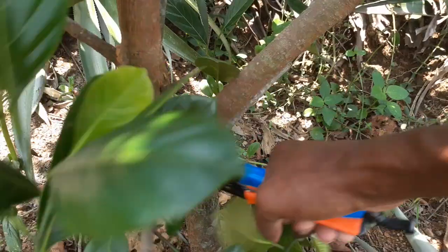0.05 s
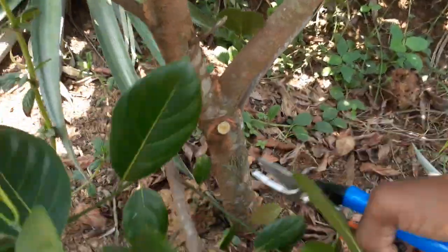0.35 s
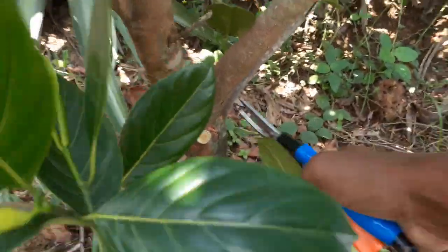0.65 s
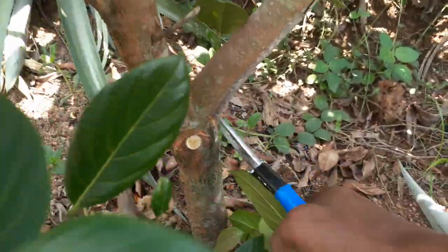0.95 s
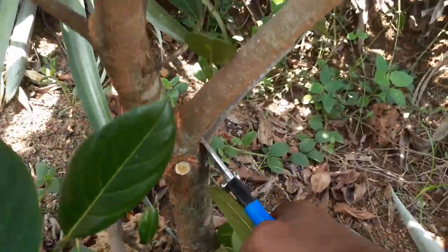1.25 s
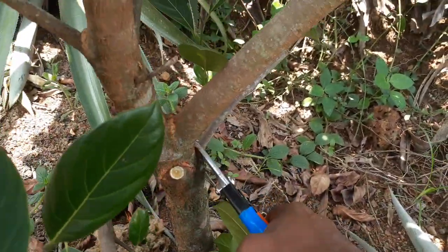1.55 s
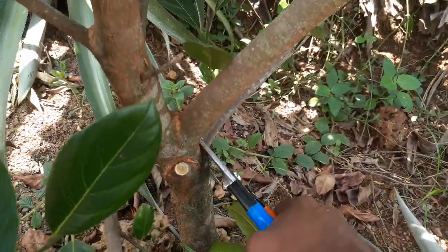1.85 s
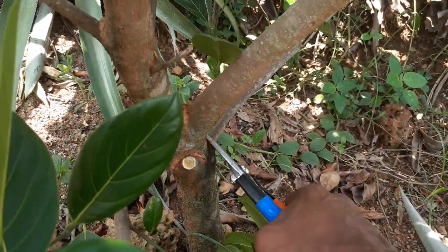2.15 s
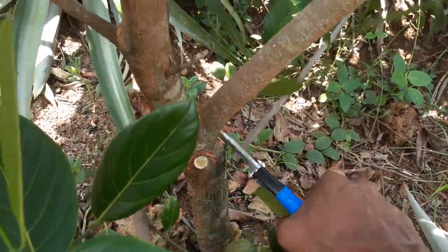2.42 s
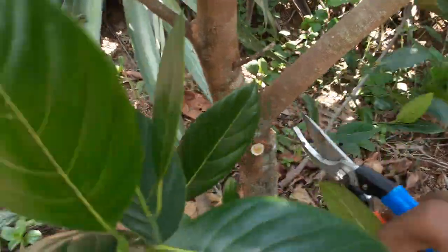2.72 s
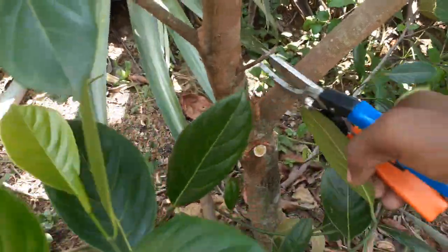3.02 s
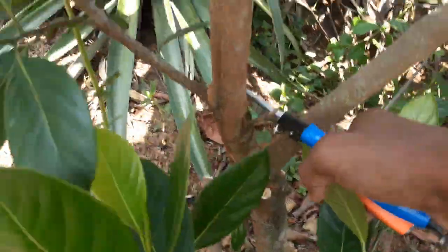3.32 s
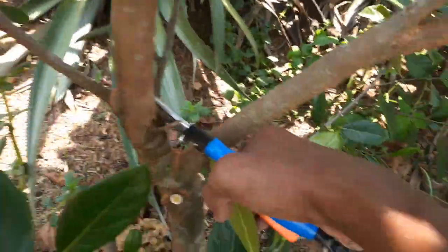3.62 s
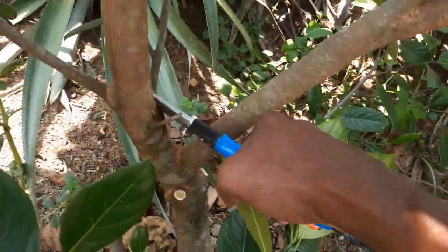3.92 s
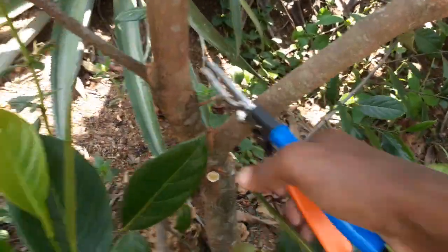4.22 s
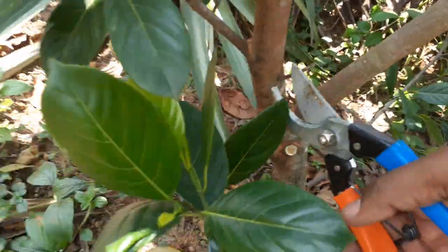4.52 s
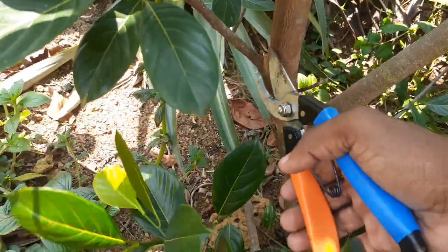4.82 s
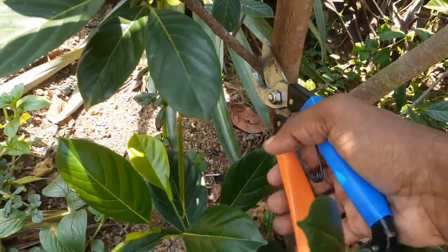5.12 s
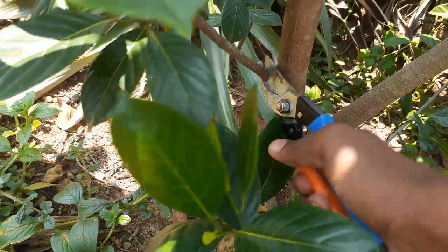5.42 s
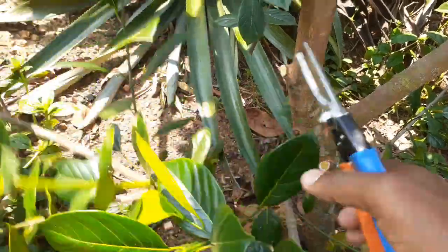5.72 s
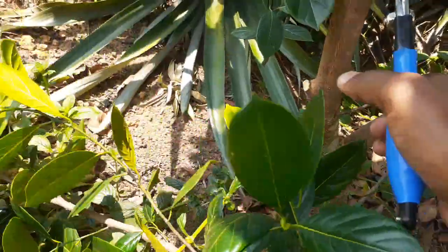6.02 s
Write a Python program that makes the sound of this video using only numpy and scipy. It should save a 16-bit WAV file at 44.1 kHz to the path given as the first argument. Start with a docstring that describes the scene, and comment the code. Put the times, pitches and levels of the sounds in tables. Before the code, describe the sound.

Hand pruning shears work on a small tree, close to the microphone and slightly right. Right at the start a green stem snaps as the jaws shut; at 0.2 seconds the shears clack open amid a rustle of stiff leaves. Dull bumps touch the microphone, mostly on the left, until about 1.5 seconds. The blade then creaks faintly into the wood, and a second stem snaps at 2.5 seconds, followed by rustling and ticking leaves. More bumps come around 3.6 seconds, then a short, faint creak and a third sharp snap at 4.1. Leaves swish and the blade rasps briefly before the fourth cut at 5.5 seconds. A stronger leafy rustle peaks just before 6 seconds. Behind it all, the quiet garden holds a faint low rumble, with very faint distant bird chirps around 1 and 5 seconds.

```python
"""A quiet garden, with hand pruning shears close to the microphone and a little to its right.
Four leafy shoots come off a small tree: fibres tear and each stem snaps as the jaws shut; before two
of the cuts the blade creaks into the green wood, and after the first the shears clack open. Leaves
rustle as the shoots are pulled away, and some bump the microphone, mostly on the left.
Far birds and a faint rumble lie behind."""
import sys
import numpy as np
from scipy import signal
from scipy.fft import rfft, irfft, next_fast_len
from scipy.io import wavfile

SR = 44100
rng = np.random.default_rng(int(sys.argv[2]) if len(sys.argv) > 2 else 0)


def wav_out(sig):
    """Save sig, one row per channel (or a flat mono array), as 16-bit PCM at SR to the path in sys.argv[1]."""
    wavfile.write(sys.argv[1], SR, np.round(np.clip(np.atleast_2d(sig).T, -1, 1) * 32767).astype(np.int16))


N = 271656
T = np.arange(N) / SR
TOP_HZ = 15900

# spectrum of breaking green wood: frequency_hz, level_db
WOOD_SPECTRUM = [(60, -12.5), (250, -9), (450, -11), (700, -8.5), (1000, -15.5), (1350, 4.5), (1850, -5),
                 (2400, -1.5), (4300, -5.5), (6200, -13.5), (8500, -21), (11500, -13), (15500, -10.5)]
# spectrum of leaves rubbing close by: frequency_hz, level_db
LEAF_SPECTRUM = [(150, -6), (400, -5), (800, -2.5), (1500, -5.5), (3000, 1), (5000, -3), (6500, -7),
                 (8200, -13), (11000, -10), (15500, -12.5)]


def cuts(metal_db=3, pop_db=-12, pop_lead_s=0.0034, clack_db=5):
    """Fibres fail harder and harder, the bark pops, the stem snaps, the jaws slam and splinters fade."""
    # stems cut through: snap_s, crack_db, ring_hz, ring_db, knock_db, thump_db, treble_db,
    # lead_db, lead_s, tail_db, tail_s
    snaps = [(0.0103, -7, 1477, -16.5, -28.5, -31, -0.5, -18, 0.0073, -14.5, 0.018),
             (2.4511, -9, 1271, -8, -33.5, -23, 4.5, -23.5, 0.0074, -3, 0.0086),
             (4.0788, -4, 1352, -8.5, -22.5, -24, 3.5, -10.5, 0.0048, -4.5, .0080),
             (5.5112, -5, 1350, -12, -27, -20, 1, -12.5, 0.0045, -10.5, 0.012)]
    # resonances of the shears in a snap: pitch_hz, width_hz, level_db
    shear_modes = [(1398, 170, -7.5), (2340, 130, 0), (2980, 260, -1.5), (3480, 170, -5.5), (4142, 280, -4),
                   (5100, 230, -0.5), (6700, 500, -17.5)]
    out, before = np.zeros((2, N)), SR // 20
    t = (np.arange(SR // 5) - before) / SR
    for (snap_s, crack_db, ring_hz, ring_db, knock_db, thump_db, treble_db,
         lead_db, lead_s, tail_db, tail_s) in snaps:
        lead = undb(lead_db) * np.exp(-abs(t) / lead_s)
        snap = 1.25 * np.exp(-np.maximum(t - .001, 0) / .0019)
        tail = undb(tail_db) * np.exp(-abs(t) / tail_s)
        fibres = np.where(t < 0, lead, np.hypot(snap, tail)) * grains(len(t), 20000, 2.5)
        pop = undb(pop_db) * np.exp(-((t + pop_lead_s) / .0006) ** 2) * grains(len(t), 20000, 2.5)
        splinters = fibres + shape(pop, lambda f: above(f, 2100))
        wood = shape(splinters, lambda f: contour(f, WOOD_SPECTRUM) * undb(treble_db * above(f, 5400)))
        metal = undb(metal_db) * sum(undb(db) * resonate(fibres, hz, bw) for hz, bw, db in shear_modes)
        crack = from_right(undb(crack_db) * (wood + 0.48 * metal))
        jaws = undb(ring_db) * ring(t, ring_hz, .001, .0023)
        knock = ring(t, 620, 0.0021, 0.0038, left_db=-4)
        clack = undb(clack_db) * ring(t, 2130, 0.00046, 0.0019, left_db=-1)
        thump = undb(thump_db) * ring(t, 160, 0.0012, 0.00046, left_db=-5.5)
        add(out, snap_s - before / SR, crack + jaws + undb(knock_db) * (knock + clack) + thump)
    return out


def blade(slips, low_db, low_hz=1400, low_width_hz=280):
    """Small jolts ring the blade over a dull crunch, which grows with the lowest resonance."""
    # upper resonances of the blade: pitch_hz, width_hz, level_db
    blade_modes = [(2470, 760, -9), (3160, 310, 2.5), (3400, 340, -4), (5080, 1200, -6), (5910, 230, -9),
                   (6700, 640, -11.5)]

    def mode(hz, width_hz):
        return resonate(resonate(slips, hz, width_hz), hz, width_hz)

    lowest = undb(low_db + 0.8) * mode(low_hz, low_width_hz)
    upper = sum(undb(db) * mode(hz, width_hz) for hz, width_hz, db in blade_modes)
    crunch = unit(shape(slips, lambda f: contour(f, WOOD_SPECTRUM) * band(f, 250, 1000)))
    return (lowest + upper) / np.std(upper) + undb(-10 + 0.58 * low_db) * crunch


def creaks(bite_s=0.016, sink_s=0.27, spread_db=3, rub_db=-5, unevenness=0.33, tick_db=-11):
    """The blade sticks and slips through the wood, rubbing in between; the slips slow as it sinks in."""
    # the blade pressed through a stem: start_s, end_s, level_db, slope_db_per_s, first_gap_s,
    # last_gap_s, lowest_resonance_db
    squeezes = [(1.51, 2.41, -74, -10.5, .005, .025, -9), (3.769, 4.06, -73, 1, .0025, 0.0054, -0.5)]
    out = np.zeros((2, N))
    for start_s, end_s, level_db, slope_db_per_s, first_gap_s, last_gap_s, low_db in squeezes:
        t = T[:int((end_s - start_s) * SR)]
        depth = np.minimum(t / sink_s, 1)
        gap_s = first_gap_s * (last_gap_s / first_gap_s) ** depth
        timing, size = rng.standard_normal((SR // 100, 2)).T
        slip_at = np.searchsorted(np.cumsum(1 / gap_s) / SR, np.cumsum(np.exp(unevenness * timing)))
        inside = slip_at < len(t)
        slips = np.zeros(len(t))
        slips[slip_at[inside]] = undb(spread_db * np.clip(size[inside], -2, 2))
        slips = unit(slips * np.sqrt(gap_s))  # a longer hold lets go harder
        tick = undb(tick_db) * unit(shape(slips, lambda f: above(f, 2500) * below(f, 7600, order=16)))
        rub = undb(rub_db) * grains(len(t), 4000, 2)
        creak = blade(slips + rub, low_db) + tick * depth
        envelope = np.minimum(t / bite_s, 1) * undb(level_db + slope_db_per_s * t)
        add(out, start_s, from_right(creak, shadow_db=16.5) * envelope)
    return out


def rasps():
    """Short rasps of the blade in wood, and a clack of the shears springing open."""
    # the shears clacking open (first row), then the blade rasping in wood:
    # start_s, level_db, decay_s, lowest_resonance_hz, lowest_resonance_db, hiss_db
    strokes = [(0.197, -39, 0.0013, 1280, 18, -9), (1.352, -77.5, 0.048, 1400, -12, 9),
               (2.343, -63, 0.0026, 1470, 12, 5.5), (2.35, -71, 0.05, 1400, 6.5, -3.5),
               (2.404, -58, 0.0038, 1380, 13, 9), (2.414, -51, 0.008, 1320, 8, 6.5),
               (2.431, -51.5, 0.017, 1350, 13, 3), (3.401, -65.5, 0.0015, 1414, -9, -8.5),
               (3.424, -71.5, .026, 1490, 0.5, 0.5), (3.646, -74, 0.023, 1380, 1.5, 3),
               (3.764, -71, .016, 1400, -11, -18), (3.796, -64, 0.0075, 1360, 15.5, -14.5),
               (4.055, -45, 0.0031, 1520, 6, -12.5), (4.06, -43.5, 0.0073, 1500, 11.5, -14),
               (4.232, -55.5, 0.019, 1380, 8.5, -4), (4.305, -56, 0.0056, 1360, 12, -5),
               (4.422, -55, 0.0013, 1440, 13, -8), (5.252, -56, 0.0057, 1460, 10, -3),
               (5.28, -56, 0.0091, 1490, 10.5, -2), (5.322, -51, 0.0021, 1460, 15.5, 8.5),
               (5.462, -62, 0.0095, 1520, 10, 7), (5.481, -51.5, 0.0071, 1530, 14, -0.5),
               (5.689, -64, .021, 1390, 10, -2.5)]
    out, t = np.zeros((2, N)), T[:SR // 6]
    for start_s, level_db, decay_s, low_hz, low_db, hiss_db in strokes:
        slips = grains(len(t), 4500, 2.6)
        edge_hz = np.interp(decay_s, [.008, .016], [15000, 6500])  # slow scrapes are duller
        hiss = unit(shape(slips, lambda f: contour(f, WOOD_SPECTRUM) * band(f, 2200, edge_hz)))
        rasp = blade(slips + slips[0], low_db, low_hz) + undb(hiss_db) * hiss
        add(out, start_s, from_right(rasp) * undb(level_db) * burst(t, decay_s / 2, decay_s))
    return out


def leaves(grains_per_s=4500, flutter_db=2, rings_db=-3):
    """Stiff leaves slide over each other: dense, surging crackle with a papery body and a fine fizz."""
    level_db, body_db, pan_db = sweeps()
    fizz_db = -6.5 + 0.07 * (level_db + 55)  # harder sweeps fizz slightly more
    side_db = np.array([[.5], [-.5]]) * pan_db
    taps = undb(rings_db) * leaf_rings() + stray_ticks()
    friction = grains(N, grains_per_s, 2) * undb(flutter_db * surge(N, 48))
    crackle = unit(shape(friction, lambda f: contour(f, LEAF_SPECTRUM)))
    # long waves reach both sides of the microphone; only short ones are shadowed
    body = unit(shape(crackle + 0.24 * crackle[::-1], lambda f: above(f, 110) * below(f, 1200, order=8)))
    rasp = unit(shape(crackle + taps, lambda f: band(f, 1200, 6900, order=8)))
    bright = shape(rasp, lambda f: above(f, 4000, order=6))
    rasp = rasp - bright + bright * undb(0.57 * side_db)
    fizz = unit(shape(crackle, lambda f: above(f, 9200, order=8) * below(f, TOP_HZ, order=30)))
    return (body * undb(body_db) + rasp + fizz * undb(fizz_db + side_db)) * undb(level_db)


def sweeps():
    """Foliage swells and settles, the stronger sweep setting the colour. Gives level, body, pan in dB."""
    # shoots pulled away or brushed: peak_s, level_db, swell_s, settle_s, body_db, treble_left_db
    swishes = [(.03, -45.5, 0.012, 0.066, -5.5, -5), (0.193, -40, 0.056, 0.053, -7, -9.5),
               (.5, -60, 0.28, 0.13, -8.5, -15), (.75, -65.5, 0.062, 0.036, -2, -3),
               (.93, -78, 0.11, 0.08, -9, -6), (2.488, -55, .015, 0.04, -6, -8),
               (2.639, -48, 0.057, 0.035, -7.5, -8), (2.815, -53.5, 0.056, 0.063, -8, -13),
               (2.935, -61, .035, 0.053, -9, -12), (3.18, -73.5, 0.086, 0.05, -16, -18),
               (4.151, -55, 0.049, 0.097, -2, -4), (4.275, -49, 0.029, 0.025, -9.5, -9.5),
               (4.41, -59, 0.071, 0.091, -8.5, -9.5), (4.565, -56, 0.056, 0.026, -5, -5.5),
               (4.71, -61.5, 0.12, 0.075, -7.5, -13.5), (5.294, -56.5, 0.042, 0.066, -6.5, -12),
               (5.42, -63.5, .04, 0.079, -15, -14), (5.55, -60.5, .02, 0.06, -3, -8),
               (5.721, -56.5, 0.045, 0.054, -10, -8.5), (5.846, -43.5, 0.049, 0.036, -6.5, -3.5),
               (5.947, -39.5, 0.027, 0.023, -6, 0), (6.07, -56.5, 0.085, 0.047, -9, -7)]
    peak_s, level_db, swell_s, settle_s, body_db, pan_db = np.transpose(swishes)[..., None]
    age = T - peak_s
    swell = -(age / swell_s) ** 2
    settle = 2 - 2 * np.hypot(1, age / settle_s)
    power = undb(level_db) ** 2 * np.exp(np.where(age < 0, swell, settle)) + 1e-18
    total = power.sum(0)
    return 10 * np.log10(total), (power * body_db).sum(0) / total, (power * pan_db).sum(0) / total


def leaf_rings(count=18):
    """Each stiff leaf has its own brief pitch and is tapped now and then."""
    pitches_hz = np.geomspace(1300, 6200, count) * np.exp(0.023 * rng.standard_normal(count))
    return unit(sum(resonate(grains(N, 45, 6), hz, 110 + hz / 30) for hz in pitches_hz))


def stray_ticks(ticks_per_s=14, tick_db=-7, spread_db=4):
    """Now and then a leaf edge catches and lets go with a dry tick."""
    catches = grains(N, ticks_per_s, spread_db)[0]
    release = burst(T[:SR // 60], 0.00035, .0025)
    envelope = np.sqrt(np.abs(signal.fftconvolve(catches ** 2, release ** 2)[:N]))
    ticks = envelope * grains(N, 12000, 2.8)
    return undb(tick_db) * unit(shape(ticks, lambda f: contour(f, LEAF_SPECTRUM)))


def clicks(ring_db=5):
    """Sharp clicks, each with a brief pitch: leaves and stalks flicking, and the shears springing open."""
    # the shears springing open (first row), then leaves and stalks: start_s, level_db, decay_s, treble_db
    hits = [(.199, -30.5, .0018, -9), (.286, -47, .002, 20), (.523, -49.5, 0.0099, 18),
            (.826, -58, .0014, 6), (0.858, -57, .0016, -3), (2.653, -35.5, 0.002, -10),
            (2.704, -44, 0.0045, -15), (2.789, -41.5, 0.0062, 9), (2.94, -47, 0.0098, 2),
            (3.02, -52.5, 0.0085, 5), (3.229, -59.5, 0.006, 8.5), (4.51, -48.5, 0.0046, -5),
            (4.628, -48.5, 0.0022, 0), (4.978, -59.5, 0.0028, -12.5), (5.524, -29.5, 0.007, -14)]
    out, t = np.zeros((2, N)), T[:SR // 10]
    for start_s, level_db, decay_s, treble_db in hits:
        taps = grains(len(t), 12000, 3) * burst(t, .0003, decay_s)
        pitched = taps + undb(ring_db) * resonate(taps, rng.uniform(2900, 5170), 450)
        crackle = shape(pitched, lambda f: contour(f, LEAF_SPECTRUM) * undb(treble_db * above(f, 4300)))
        add(out, start_s, from_right(crackle) * np.std(taps) / np.std(crackle) * undb(level_db))
    return out


def bumps(stereo_width=0.73, bass_db_per_octave=-10.5):
    """Leaves, hand and tool bump at the microphone; a softer touch has a lower edge and more bass."""
    # soft contacts, mostly on the left: start_s, level_db, decay_s, upper_edge_hz, left_minus_right_db
    contacts = [(.205, -37, 0.0078, 292, 4), (.381, -40, 0.0087, 373, 20), (0.714, -44, 0.012, 604, 31),
                (.868, -38, 0.0067, 430, 27.5), (1.24, -33.5, 0.019, 363, 27.5),
                (1.448, -35.5, 0.023, 310, 23), (2.411, -38.5, 0.035, 470, 10),
                (2.577, -43.5, 0.0049, 2850, -1.5), (3.554, -36.5, .0035, 2596, 14),
                (3.556, -33.5, 0.0058, 500, 15.5), (3.626, -45.5, 0.012, 521, 4),
                (3.651, -47, 0.0052, 1120, 15), (3.737, -47, 0.013, 560, 16.5),
                (3.806, -39.5, 0.0068, 224, 16), (4.093, -38, 0.0064, 420, 1),
                (4.115, -38, 0.0074, 400, 11), (6.044, -45, 0.0021, 1200, 0.5)]
    # spectrum of a dull contact: frequency_hz, level_db
    thud_spectrum = [(30, -15.5), (80, 10.5), (170, -7), (370, -2.5), (560, -14.5), (850, -2), (1300, -13),
                     (1900, -10), (4000, -14), (15000, -16.5)]
    out, t = np.zeros((2, N)), T[:SR // 4]
    for start_s, level_db, decay_s, edge_hz, pan_db in contacts:
        bass_db = -2 + bass_db_per_octave * np.log2(edge_hz / 500)
        push = rng.standard_normal(len(t)) + stereo_width * rng.standard_normal((2, len(t)))
        thud = shape(push, lambda f: contour(f, thud_spectrum) * below(f, edge_hz)
                     * undb(bass_db * below(f, 120)))
        envelope = burst(t, decay_s / 2, decay_s)
        bump = unit(thud * envelope) * np.sqrt(np.mean(envelope ** 2))
        add(out, start_s, bump * undb(level_db - np.array([[0], [pan_db]])))
    return out


def birds(scatter_s=0.047, clear_share=0.25, waver=.025):
    """Thin far-off whistles, partly clear and partly blurred by the trees they pass through."""
    # distant bird calls: start_s, start_hz, end_hz, length_s, level_db
    chirps = [(0.796, 2550, 2280, .069, -78.5), (.943, 2810, 3220, .13, -80),
              (1.119, 4583, 4460, 0.026, -85), (1.214, 2560, 2390, 0.072, -81.5),
              (1.32, 4520, 4580, .03, -80), (1.448, 2794, 3000, 0.059, -78),
              (4.752, 2860, 2680, 0.0398, -73), (4.816, 2255, 2425, 0.031, -75.5),
              (4.985, 2530, 2196, 0.059, -78.5), (5.105, 2694, 2967, .11, -77.5)]
    out, t = np.zeros((2, N)), T[:SR // 8]
    for start_s, start_hz, end_hz, length_s, level_db in chirps:
        n = int(length_s * SR)
        pitch_hz = np.linspace(start_hz, end_hz, n) * (1 + waver * surge(n, 150))
        whistle = np.sin(2 * np.pi * np.cumsum(pitch_hz) / SR) * np.sqrt(np.hanning(n))
        trees = rng.standard_normal((2, len(t))) * np.exp(-t / scatter_s)
        blurred = signal.fftconvolve(whistle[None], trees, axes=1)
        add(out, start_s, undb(level_db) * blurred / blurred.std(1).mean() * np.sqrt(.5))
        add(out, start_s, undb(level_db) * clear_share * unit(whistle))
    return out


def garden(rumble_db=-57.5, air_db=-83, left_db=3, stereo_width=0.72):
    """A low rumble, a little stronger on the left, and a trace of airy hiss."""
    # spectrum of the garden background: frequency_hz, level_db
    ambience = [(20, -13.5), (45, -7.5), (70, 2), (95, 2), (125, -10.5), (180, -13.5), (430, -30),
                (800, -33.5), (1900, -43), (2900, -37.5), (4000, -50.5), (6300, -43.5), (8300, -56),
                (13000, -44.5), (16000, -54)]
    noise = rng.standard_normal(N) + stereo_width * rng.standard_normal((2, N))
    side_db = np.array([[left_db], [0]])
    rumble = unit(shape(noise, lambda f: contour(f, ambience) * undb(side_db * below(f, 200))))
    air = unit(shape(rng.standard_normal((2, N)), lambda f: contour(f, LEAF_SPECTRUM)))
    return undb(rumble_db) * rumble + undb(air_db) * from_right(air, shadow_db=5.5)


def from_right(x, shadow_db=9, edge_hz=4800):
    """Sound from the right: the left of the microphone lies in shadow for the treble."""
    return shape(x, lambda f: undb(np.array([[-.65], [.35]]) * shadow_db * above(f, edge_hz)))


def ring(t, hz, rise_s, decay_s, lag_s=.00007, left_db=2.5):
    """A damped swing that reaches the left of the microphone a little later."""
    age = np.maximum(t - np.array([[lag_s], [0]]), 0)
    balance = undb(np.array([[left_db], [-left_db]]) / 2)
    return balance * burst(age, rise_s, decay_s) * np.sin(2 * np.pi * hz * age)


def grains(n, per_s, spread_db):
    """Random tiny clicks of unequal size, different left and right."""
    sizes = undb(spread_db * np.clip(rng.standard_normal((2, n)), -2, 2))
    return unit(sizes * rng.choice([-1, 1], (2, n)) * (rng.random((2, n)) < per_s / SR))


def burst(t, rise_s, decay_s):
    """A quick swell and an exponential decay, peaking at 1."""
    envelope = (1 - np.exp(-(t / rise_s) ** 2)) * np.exp(-t / decay_s)
    return envelope / envelope.max()


def surge(n, rate_hz):
    """A smooth random wander with rms 1."""
    return unit(shape(rng.standard_normal(n), lambda f: below(f, rate_hz)))


def resonate(x, hz, width_hz):
    """One damped resonance with gain 1 at its centre."""
    return signal.lfilter(*signal.iirpeak(hz, hz / width_hz, SR), x)


def shape(x, gain):
    """Filter by a function of frequency."""
    n = next_fast_len(x.shape[-1], True)
    f = np.maximum(np.fft.rfftfreq(n, 1 / SR), 1)
    return irfft(rfft(x, n) * gain(f), n)[..., :x.shape[-1]]


def contour(f, points):
    """Gain of a spectrum given as frequency_hz, level_db."""
    hz, db = np.transpose(points)
    return undb(np.interp(np.log(f), np.log(hz), db))


def above(f, edge_hz, order=4):
    """Smooth step from 0 to 1 at an edge."""
    return 1 / (1 + (edge_hz / f) ** order)


def below(f, edge_hz, order=4):
    return 1 - above(f, edge_hz, order)


def band(f, low_hz, high_hz, order=4):
    return above(f, low_hz, order) * below(f, high_hz, order)


def undb(db):
    return 10 ** (np.asarray(db) / 20)


def unit(x):
    """Scale to rms 1."""
    return x / np.sqrt(np.mean(x ** 2))


def add(out, start_s, x):
    """Mix a short sound in at start_s."""
    start = int(start_s * SR)
    lo, hi = max(start, 0), min(start + x.shape[-1], N)
    out[:, lo:hi] += x[..., lo - start:hi - start]


def scene():
    """Shears and foliage up close, birds and garden far behind."""
    return cuts() + creaks() + rasps() + leaves() + clicks() + bumps() + birds() + garden()


def record(dry, low_cut_hz=42):
    """The recorder thins the deepest bass, rounds the sharpest peaks and cuts the top."""
    thinned = signal.sosfilt(signal.butter(3, low_cut_hz, "high", fs=SR, output="sos"), dry)
    return signal.sosfilt(signal.ellip(10, .2, 80, TOP_HZ, fs=SR, output="sos"), np.tanh(thinned))


dry = scene()
out = record(dry)
wav_out(out)
```